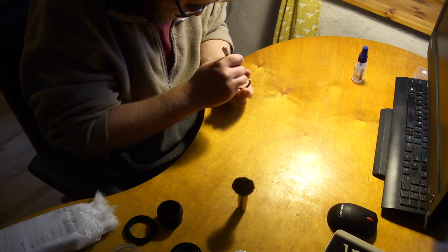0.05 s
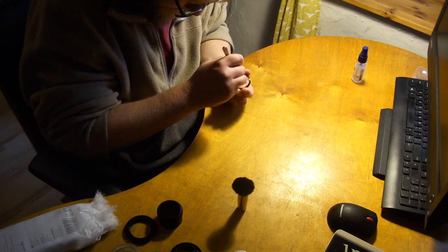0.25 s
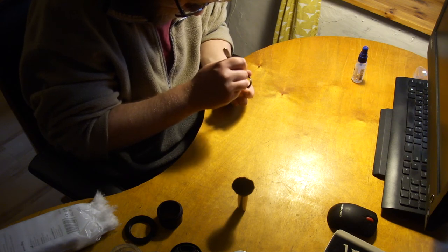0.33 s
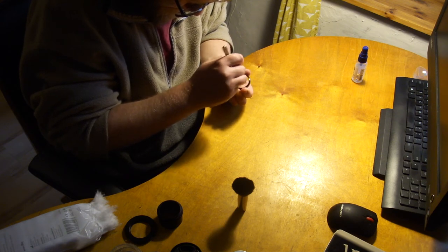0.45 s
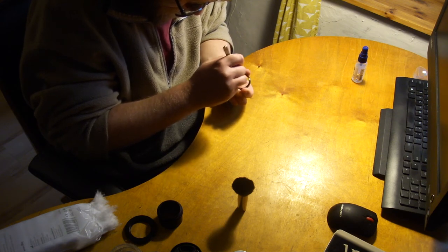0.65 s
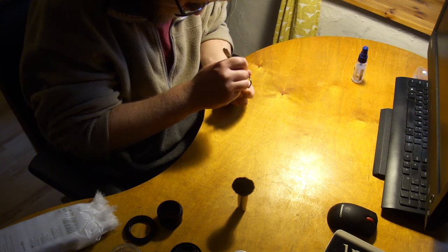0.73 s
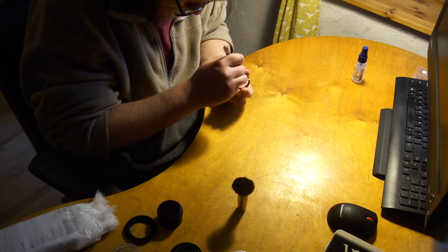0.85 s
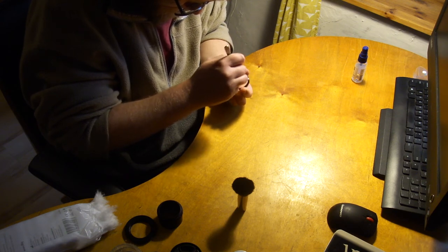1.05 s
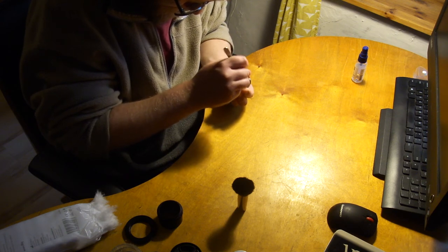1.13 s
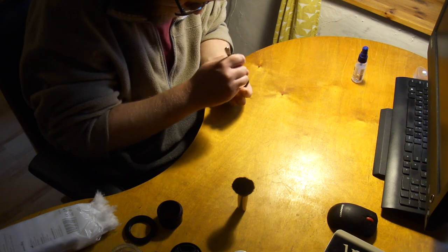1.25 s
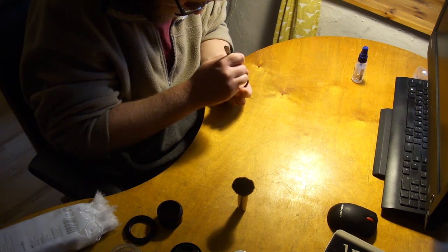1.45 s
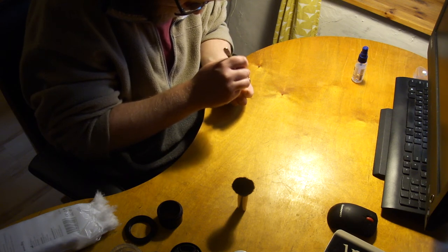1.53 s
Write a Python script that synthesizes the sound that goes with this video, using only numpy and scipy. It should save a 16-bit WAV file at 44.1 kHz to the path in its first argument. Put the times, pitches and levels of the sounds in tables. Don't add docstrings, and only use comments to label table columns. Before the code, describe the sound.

Close, dry rubbing of glass makes a run of very short, piercing squeaks that sag in pitch, with soft cloth scuffs between them and a short room ring; they stop, leaving faint wavering fan air and hiss.

```python
import sys
import numpy as np
from scipy import signal
from scipy.fft import rfft, irfft
from scipy.io import wavfile
from scipy.ndimage import uniform_filter1d

SR = 44100
rng = np.random.default_rng(int(sys.argv[2]) if len(sys.argv) > 2 else 0)


def inscribe(sig):
    pcm = np.round(np.clip(np.atleast_2d(sig).T, -1, 1) * 32767)
    wavfile.write(sys.argv[1], SR, pcm.astype(np.int16))


N = 70560


def gain_of(db):
    return 10 ** (np.asarray(db) / 20)


def evened(x):
    return x / np.sqrt(np.mean(x ** 2) + 1e-20)


def read(points, hz):
    f, value = np.transpose(points)
    return np.interp(np.log(hz + 1), np.log(f + 1), value)


def slow_drift(size):
    return evened(uniform_filter1d(uniform_filter1d(rng.standard_normal(N), size), size))


def left_right(db):
    return gain_of(db * np.array([[0.5], [-0.5]]))


def stroke(start, length, rise, fall):
    t = np.arange(N) / SR - start
    progress = np.clip(t / length, -1.5, 1.2)
    growth = 1 / np.sqrt(1 + np.exp(np.clip(-2 * t / rise, -50, 50)))
    stop = 1 + np.exp(np.clip((t - length) / fall, -50, 50))
    return progress, growth / stop, growth


NOISE_HZ = np.fft.rfftfreq(512, 1 / SR)


def noise(db, same, patchy_db):
    frames = N // 128 + 5
    a, b, c, d, patch = rng.standard_normal((frames, 257, 5)).T
    patch = uniform_filter1d(patch, size=6, axis=0)
    patch = evened(uniform_filter1d(patch, size=20, axis=1))
    same = np.clip(same, -1, 1)[:, None]
    left = a + 1j * b
    right = same * left + np.sqrt(1 - same ** 2) * (c + 1j * d)
    z = np.array([left, right]) * gain_of(db[:, None] + patchy_db * patch)
    return evened(signal.istft(z, nperseg=512, noverlap=384)[1][:, :N])


# frequency in Hz, level in dB per Hz.
HISS_COLOUR = [(30, -32.5), (100, -16.5), (200, -4.5), (700, -8), (1700, -11.5), (2200, -10), (3000, -13.5),
               (14000, -22.5)]
# frequency in Hz, left-right likeness from -1 to 1.
HISS_LIKENESS = [(60, -0.31), (180, -0.39), (530, -0.54), (1580, -0.41), (4710, -0.081), (14000, 0.21)]


def hiss():
    return gain_of(-53) * noise(read(HISS_COLOUR, NOISE_HZ), read(HISS_LIKENESS, NOISE_HZ), patchy_db=0.98)


# centre in Hz, width in Hz, level in dB.
FAN_BANDS = [(1136, 223, -4), (1254, 280, -1), (2200, 160, -8), (171, 30, -9.5)]


def fan():
    level_db, left_db, likeness = -57, 8.5, -0.83
    power = sum(gain_of(db) ** 2 * np.exp(-(2 * (NOISE_HZ - hz) / width) ** 2) for hz, width, db in FAN_BANDS)
    air = noise(10 * np.log10(power + 1e-9), likeness + 0 * NOISE_HZ, patchy_db=2.0)
    waver = gain_of(0.4 * slow_drift(size=2500))
    return gain_of(level_db) * left_right(left_db) * air * waver


# start in seconds, length in seconds, level in dB.
SCUFFS = [
    (.008, 0.051, -56.5),
    (0.213, .013, -52.5),
    (0.408, 0.022, -60),
    (0.6, 0.013, -50.5),
    (.739, .008, -52.5),
    (0.876, .008, -64),
    (2.1, 0.02, -64),
    (1.5, 0.0063, -68),
]
# frequency in Hz, level in dB.
CLOTH_COLOUR = [(1500, -20.5), (3000, -1), (5000, -1), (8000, -1), (14500, -7.5)]


def cloth(pressure):
    rub_db = -24.5
    scuff = sum(gain_of(db) * stroke(start, length, 0.0021, 0.010)[1] for start, length, db in SCUFFS)
    fibres = noise(read(CLOTH_COLOUR, NOISE_HZ), 0.5 + 0 * NOISE_HZ, patchy_db=2.0)
    return fibres * (gain_of(rub_db) * pressure + scuff)


# frequency in Hz, level in dB.
TONE_COLOUR = [(2700, -0.5), (2780, -5), (2830, -6), (2885, 2.5), (2925, -2.96), (2970, -1.2), (3050, 3.1)]
# frequency in Hz, level in dB.
OCTAVE_COLOUR = [(4400, -22), (5400, -15), (5600, -21.5), (5770, -13), (5830, -20), (5900, -7),
                 (6100, -4.5)]


def squeak(row, bend, rise, fall, wobble, shimmer, bend_power=1, start_flat_hz=0):
    start, length, db, pitch, glide = row
    progress, envelope, growth = stroke(start, length, rise, fall)
    glide_hz = np.minimum(glide * np.sign(progress) * abs(progress) ** bend_power, 225)
    hz = pitch + bend * glide_hz - start_flat_hz * (1 - growth) + wobble
    phase = 2 * np.pi * np.cumsum(hz) / SR
    level = np.sqrt(2) * gain_of(db) * envelope * shimmer
    tone = level * gain_of(read(TONE_COLOUR, hz)) * np.sin(phase)
    octave = gain_of(read(OCTAVE_COLOUR, 2 * hz)) * np.cos(2 * phase + 0.27)
    third = gain_of(-34.5) * np.sin(3 * phase)
    upper = level * (level / gain_of(-26)) ** 0.2 * (octave + third)
    rub_share = 0.52
    pressure = (gain_of(db) * envelope) ** rub_share * gain_of(-30 * (1 - rub_share))
    return np.array([tone, upper, pressure])


# start in seconds, length in seconds, level in dB, pitch in Hz, sag in Hz.
LIGHT = [
    (0.015, .010, -52, 2695, 30),
    (0.031, .006, -50, 2740, 10),
    (0.128, .010, -53, 2835, 20),
    (0.203, .006, -48, 2790, 5),
    (0.529, .011, -42.5, 2850, 60),
    (0.732, .006, -54, 2830, 30),
    (0.796, .008, -67, 3020, 20),
    (.929, 0.012, -31.5, 2915, 33.4),
    (0.947, 0.0087, -39.5, 2913, 9.2),
]


def light_strokes(wobble, shimmer):
    return sum(squeak(row, -1, 0.0055, 0.0024, wobble, shimmer) for row in LIGHT)


# start in seconds, length in seconds, level in dB, pitch in Hz, sag in Hz.
FORWARD = [
    (0.214, 0.013, -28.5, 2934, 70),
    (0.4069, 0.021, -30, 3003, 199),
    (0.6033, 0.023, -30, 3051, 172.5),
    (0.805, .030, -29, 2996, 201.3),
    (1.013, 0.035, -29, 2983, 452.4),
    (1.130, 0.018, -34.5, 2874, 70),
    (1.234, 0.017, -35.5, 2721, 25),
    (1.4166, .031, -29.5, 2964, 198.5),
]


def forward_strokes(wobble, shimmer):
    return sum(squeak(row, -1, 0.0024 * (row[1] / 0.02) ** 0.35, 0.0022, wobble, shimmer,
                      bend_power=1.92, start_flat_hz=70) for row in FORWARD)


# start in seconds, length in seconds, level in dB, pitch in Hz, rise in Hz.
BACK = [
    (0.404, 0.0088, -58, 2320, 40),
    (0.481, .007, -51, 2190, 40),
    (.683, 0.0024, -59, 2200, 30.4),
    (0.784, 0.015, -47, 2250, 120),
    (0.886, 0.0088, -36.5, 2197, 28),
    (0.903, 0.011, -48.5, 2270, 10),
    (0.996, 0.01, -48, 2290, 30),
    (1.501, .012, -50.5, 2262, 51),
]


def return_strokes(wobble, shimmer):
    return sum(squeak(row, 1, 0.0036, 0.0012, wobble, shimmer) for row in BACK)


def squeaks():
    wobble = 5.1 * slow_drift(size=120)
    shimmer = gain_of(0.57 * slow_drift(size=90))
    return forward_strokes(wobble, shimmer) + light_strokes(wobble, shimmer) + return_strokes(wobble, shimmer)


# start in seconds, length in seconds, sum tone in Hz.
OVERLAP = [
    (1.002, .009, 5265),
]


def overlap():
    t = np.arange(N) / SR
    return sum(gain_of(-54) * stroke(start, length, 0.002, 0.0012)[1] * np.sin(2 * np.pi * hz * t)
               for start, length, hz in OVERLAP)


# delay in seconds, level in dB.
EARLY = [(.0075, -19.5), (0.0134, -18.5), (0.02, -25), (.027, -20.5)]
# frequency in Hz, time to fall 60 dB in seconds.
ROOM_DECAY = [(2000, 0.6), (2700, 0.31), (3000, 0.45), (6000, 0.32), (10000, .3)]


def room(x):
    tail_db, tail_start_s = -15, 0.013
    taps = np.zeros((2, SR // 2))
    at = np.arange(0, SR // 2 - 20, 20) + rng.integers(0, 20, (2, (SR // 2 - 1) // 20))
    np.put_along_axis(taps, at, rng.choice([-1., 1.], at.shape), 1)
    hz, t, z = signal.stft(taps, SR, nperseg=256)
    decay = gain_of(-60 * t / read(ROOM_DECAY, hz)[:, None])
    tail = signal.istft(z * decay, SR, nperseg=256)[1]
    tail = tail * np.clip(np.arange(tail.shape[1]) / SR / tail_start_s - 1, 0, 1)
    tail = gain_of(tail_db) * tail / np.linalg.norm(tail[0])
    for delay, db in EARLY:
        tail[:, round(delay * SR)] += gain_of(db)
    return np.array([signal.fftconvolve(v, h)[:N] for v, h in zip(x, tail)])


def scene():
    tone, upper, pressure = squeaks()
    low = tone * left_right(2.1)
    high = (upper + overlap()) * left_right(-4) + cloth(pressure)
    upper_wet_db = 3.5
    ring = room(low + gain_of(upper_wet_db) * high)
    return low + high + ring + hiss() + fan()


# frequency in Hz, level in dB.
TREBLE = [(8500, 0.66), (9700, -1.5), (10400, -11.5), (10900, -27.5), (12500, -27), (13100, -8.5),
          (14100, -21.5), (14400, -79)]


def shape_treble(dry):
    hz = np.fft.rfftfreq(N, 1 / SR)
    z = rfft(dry) * gain_of(read(TREBLE, hz))
    high = hz > 10700
    flicker = gain_of(3 * slow_drift(size=900))
    top = irfft(z * high, N) * left_right(-9) * flicker
    return irfft(z * ~high, N) + top


def low_pass(x):
    return signal.sosfilt(signal.butter(12, 14630, fs=SR, output="sos"), x)


def record(dry):
    mix = shape_treble(dry)
    return low_pass(mix)


dry = scene()
out = record(dry)
inscribe(out)
```